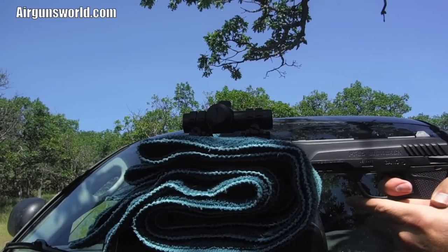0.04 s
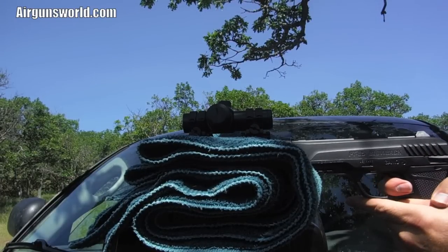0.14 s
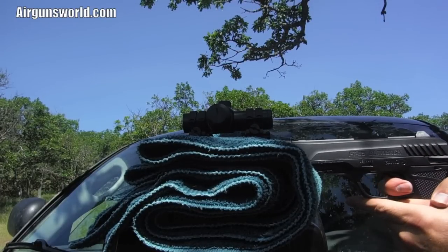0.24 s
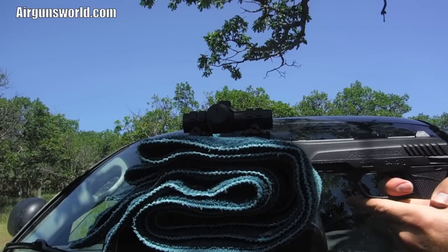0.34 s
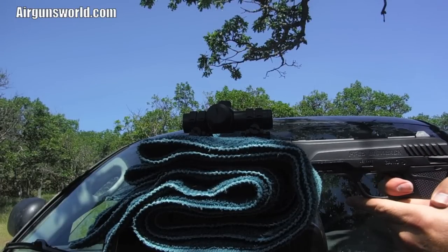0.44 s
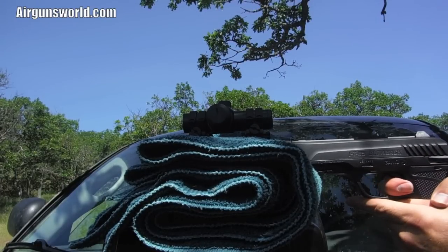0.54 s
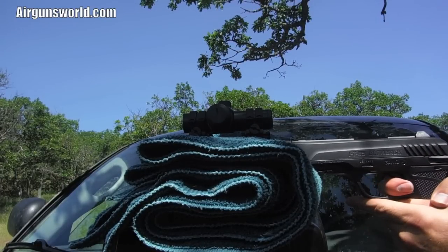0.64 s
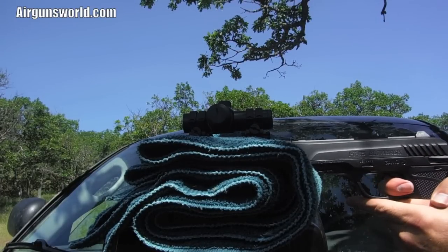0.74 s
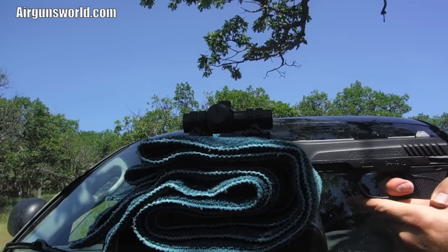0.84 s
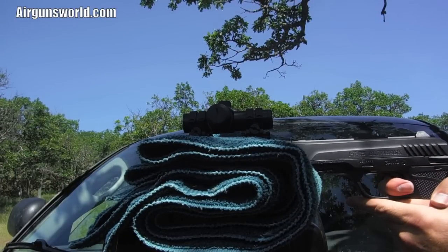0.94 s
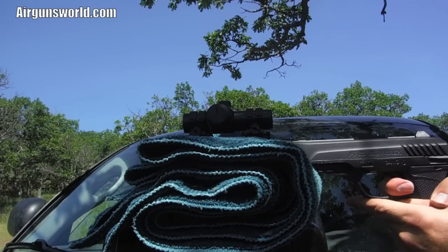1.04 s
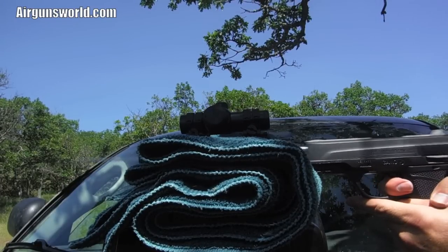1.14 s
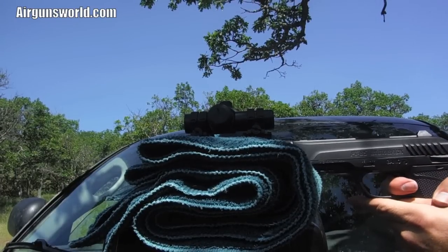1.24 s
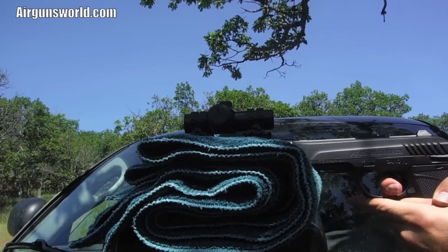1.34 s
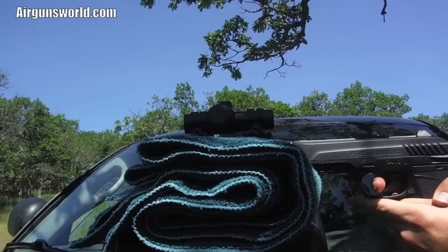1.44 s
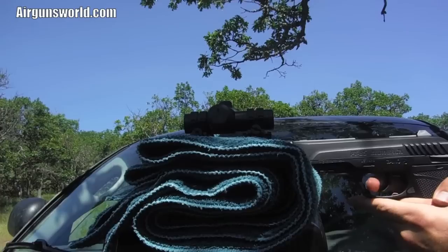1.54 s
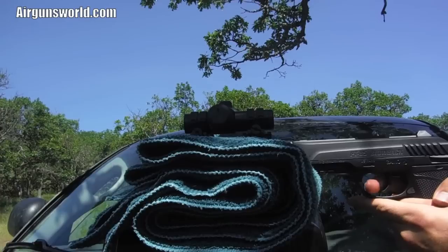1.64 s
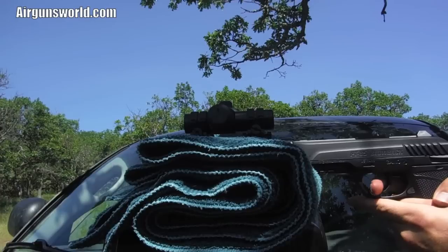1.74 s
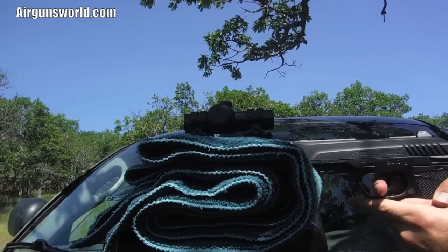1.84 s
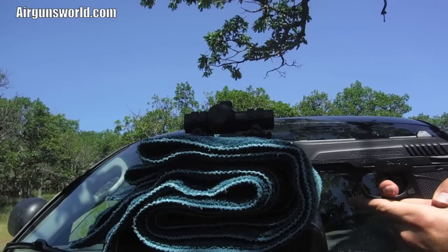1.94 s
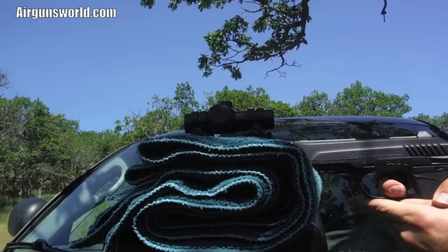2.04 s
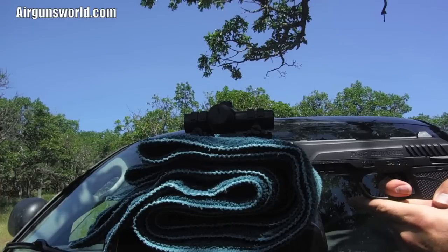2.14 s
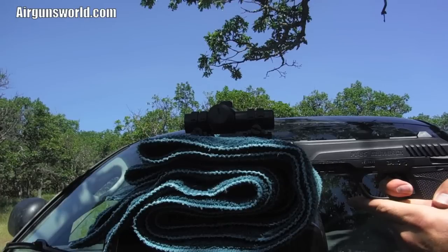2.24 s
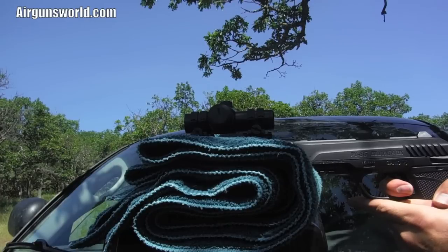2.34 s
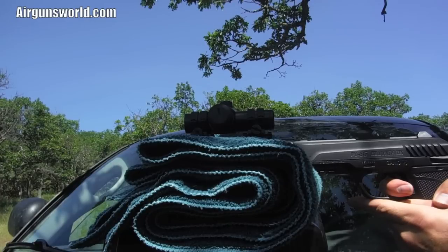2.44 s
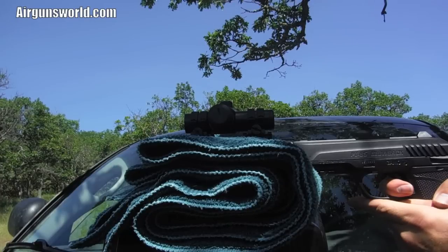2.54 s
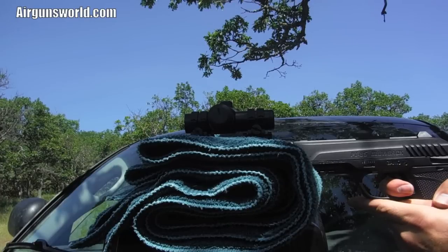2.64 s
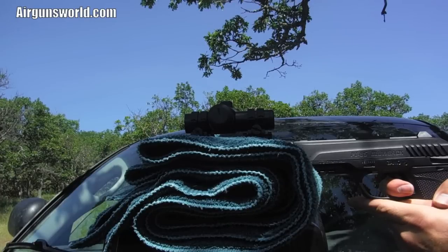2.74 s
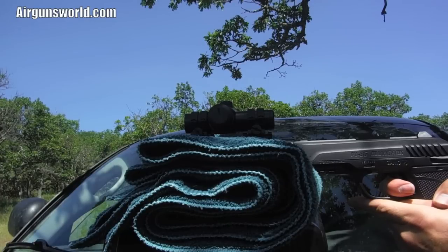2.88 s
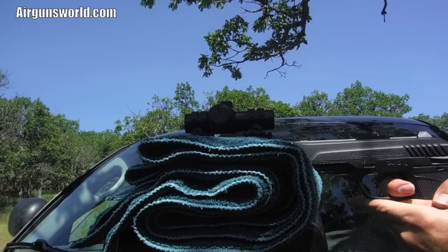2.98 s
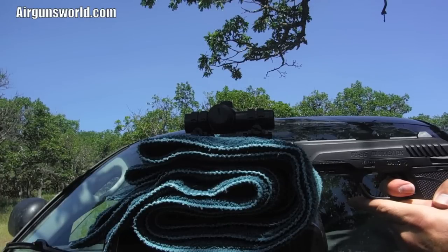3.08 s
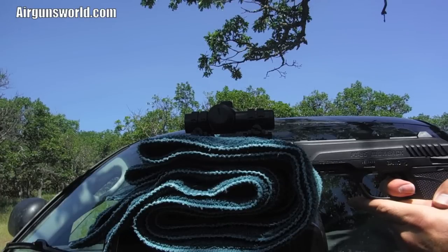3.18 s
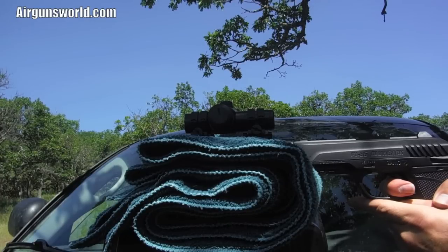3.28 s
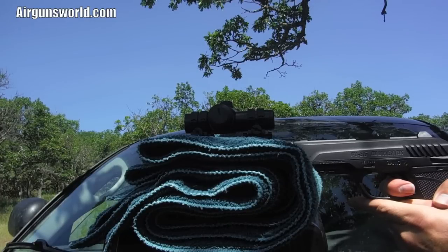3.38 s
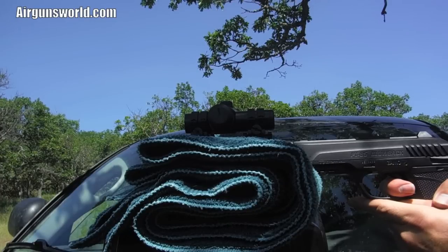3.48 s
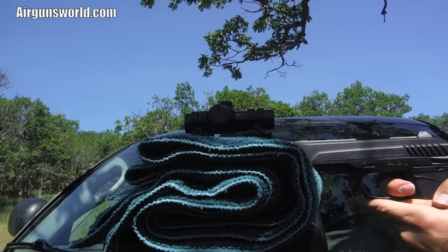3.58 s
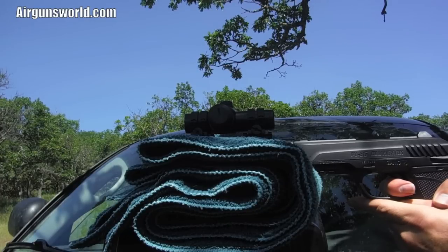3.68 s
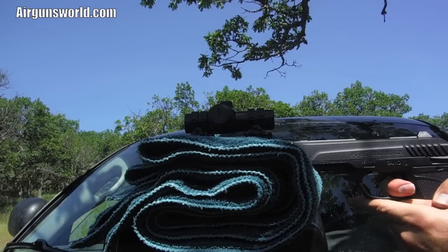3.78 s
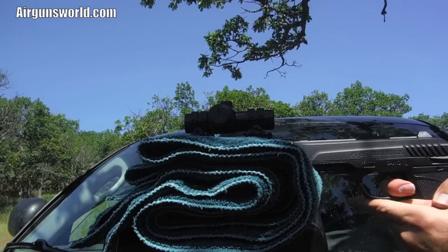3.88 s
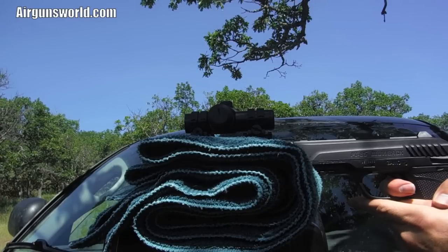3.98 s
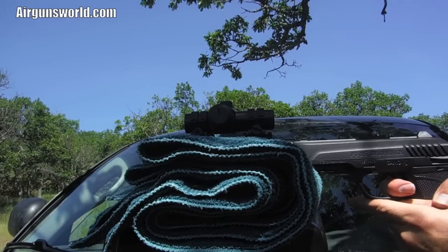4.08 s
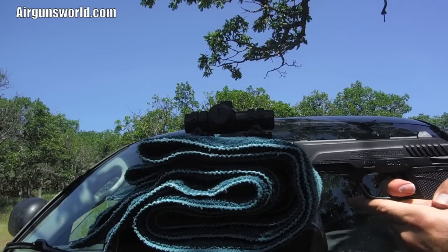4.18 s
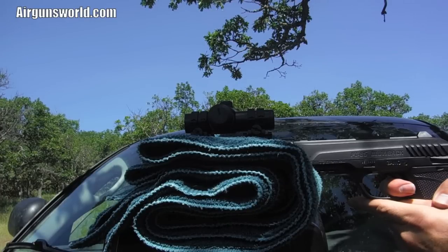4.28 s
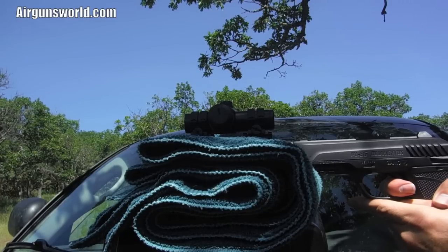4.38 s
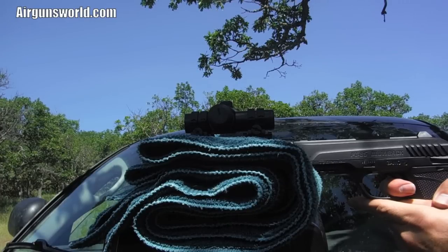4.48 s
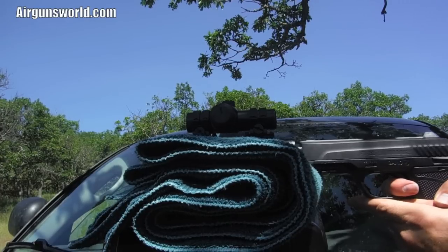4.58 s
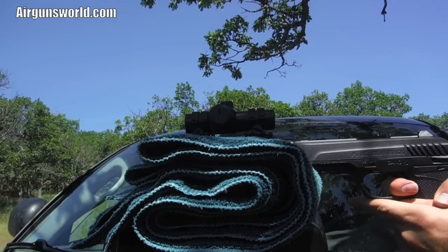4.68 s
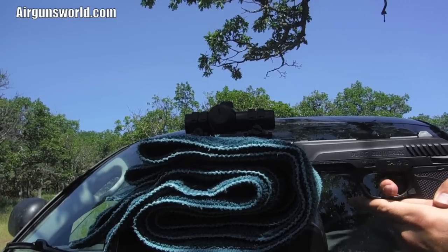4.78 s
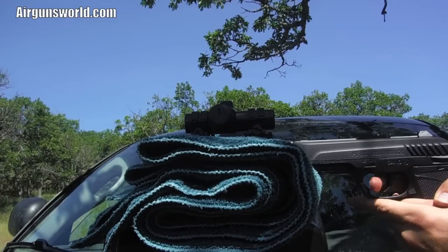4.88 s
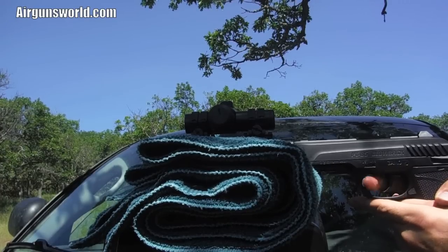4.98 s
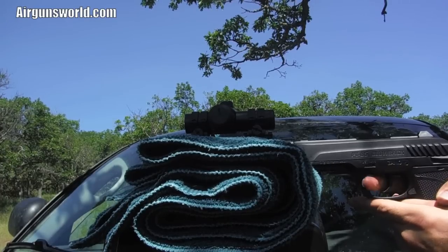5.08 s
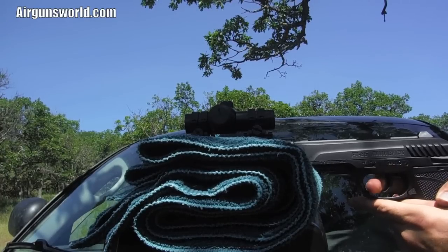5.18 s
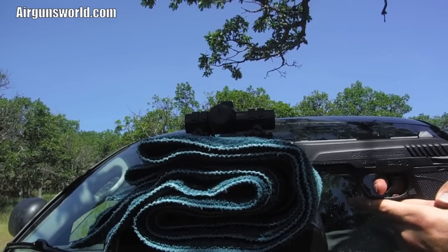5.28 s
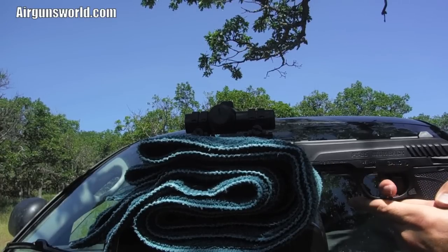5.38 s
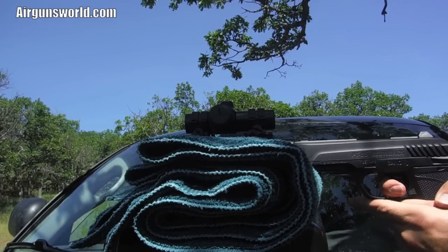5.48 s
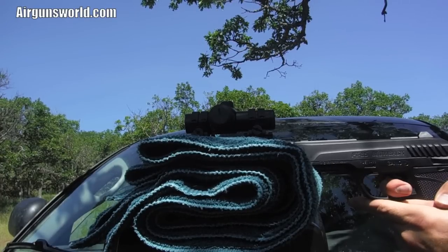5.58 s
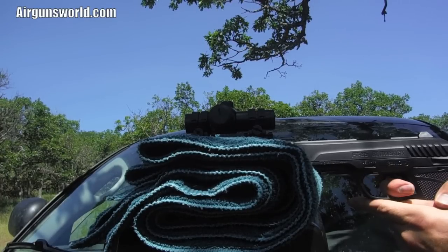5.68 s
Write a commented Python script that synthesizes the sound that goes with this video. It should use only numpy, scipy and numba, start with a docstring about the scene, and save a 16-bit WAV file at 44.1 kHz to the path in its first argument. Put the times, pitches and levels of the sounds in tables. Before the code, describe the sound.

A gas-powered air pistol fires twice outdoors, about three and a half seconds apart, close to the microphone. Each shot is a sharp, slightly overloaded blast with a metallic clang, followed at once by the pellet smacking a target and a short echo from trees. Light ticks follow, and about a second later the trigger clicks back. A faint rumble and hiss run underneath.

```python
"""Air pistol at the edge of a wood

A CO2 pistol, rested on a towel close to a camcorder, fires twice over a faint outdoor rumble. Each shot
is a sear tick, a gas blast that overloads the microphone and the clang of the action. The pellet smacks
a target, light ticks follow and the trigger clicks back. The trees scatter the blast and the smack."""
import sys
import numpy as np
from scipy import signal
from scipy.fft import rfft, irfft
from scipy.io import wavfile
from numba import njit

SR = 44100
rng = np.random.default_rng(int(sys.argv[2]) if len(sys.argv) > 2 else 0)


def to_wav(sig):
    """Store sig (one row per channel, or 1-D mono) as 16-bit WAV at the path in sys.argv[1].

    Samples outside -1..1 are clipped; the rate is SR.
    """
    pcm = np.clip(np.atleast_2d(sig), -1, 1) * 32767
    pcm = np.round(pcm).astype(np.int16)
    wavfile.write(sys.argv[1], SR, pcm.T)  # frames by channels


N = 252322
T = np.arange(N) / SR


def undb(db):
    """Decibels to gain."""
    return 10 ** (np.asarray(db) / 20)


def unit(x):
    """Scale to rms 1."""
    return x / np.sqrt(np.mean(x ** 2))


def noise(colour, tilt_db=0, size=N):
    """Noise of rms 1 shaped by an EQ curve of (freq_hz, level_db), tilted by tilt_db per octave."""
    octave = np.log2(np.fft.rfftfreq(size, 1 / SR) + 1)
    hz, db = np.transpose(colour)
    gain = undb(np.interp(octave, np.log2(hz), db) + tilt_db * octave)
    return unit(irfft(rfft(rng.standard_normal(size)) * gain, size))


def band(centre_hz, width_hz, size=N):
    """Noise of rms 1 in one steep band."""
    hz = np.fft.rfftfreq(size, 1 / SR) + 1
    gain = 1 / (1 + ((hz - centre_hz ** 2 / hz) / width_hz) ** 2)
    return unit(irfft(rfft(rng.standard_normal(size)) * gain, size))


def fade(t60_s, hold_s=0):
    """One second of envelope: a hold, then an exponential decay."""
    return np.exp(-np.log(1000) * np.maximum(T[:SR] - hold_s, 0) / t60_s)


def onset(rise_s):
    """One second of envelope that rises from silence to soften an attack."""
    return 1 - np.exp(-T[:SR] / rise_s)


def burst(colour, db, t60_s, tilt_db=0):
    """Coloured noise that starts at once and dies away."""
    return undb(db) * fade(t60_s) * noise(colour, tilt_db, size=SR)


def ping(hz, t60_s, phase=0):
    """One struck mode: a decaying sine."""
    return fade(t60_s) * np.sin(2 * np.pi * hz * T[:SR] + phase)


def ring(modes, db, sustain=1, scatter_db=1):
    """Modes of (pitch_hz, level_db, t60_s), struck a little differently each time."""
    hz, mode_db, t60_s = np.transpose(modes)
    gains = undb(mode_db + scatter_db * rng.standard_normal(len(hz)))
    phases = rng.uniform(0, 2 * np.pi, len(hz))
    tone = sum(gain * ping(f, t60 * sustain, phase) for f, gain, t60, phase in zip(hz, gains, t60_s, phases))
    return undb(db) * tone / np.sqrt(np.sum(gains ** 2) / 2)


def add(out, start_s, x):
    """Mix x in from start_s."""
    i = int(start_s * SR)
    out[i:i + len(x)] += x[:N - i]


def thin(x, hz):
    """Low cut: small, light objects radiate almost no bass."""
    return signal.sosfilt(signal.butter(3, hz, "high", fs=SR, output="sos"), x)


# EQ of the outdoor bed: freq_hz, level_db
OUTDOOR_EQ = [(12, -29), (20, 2.5), (49, -2.5), (80, 0.5), (106, -8), (133, -4), (245, -5), (315, -8),
              (614, -13.5), (1450, -22), (2760, -24.5), (8640, -27.5), (9660, -25.5), (13900, -29),
              (15500, -25.5)]


def outdoors(level_db=-50, sway_db=.5):
    """A bed of rumble and hiss whose level sways slightly."""
    return undb(level_db + sway_db * band(1.8, 4)) * noise(OUTDOOR_EQ)


# Thin bands of camcorder whine: centre_hz, width_hz, level_db
WHINE_BANDS = [(7850, 50, -75), (8200, 120, -78), (9700, 90, -70), (9950, 300, -76)]


def camcorder(field_hz=59.94, buzz_depth=.7, scan_hz=15735, scan_db=-68, throb_hz=11, throb_depth=.55):
    """The electronics whine, pulsing at the field rate, under a throbbing line-scan tone."""
    whine = sum(undb(db) * band(hz, width_hz) for hz, width_hz, db in WHINE_BANDS)
    buzz = 1 + buzz_depth * np.sin(2 * np.pi * field_hz * T)
    scan = undb(scan_db) * np.sqrt(2) * np.sin(2 * np.pi * scan_hz * T)
    throb = 1 + throb_depth * np.sin(2 * np.pi * throb_hz * T)
    return whine * buzz + scan * throb


# Cues for every layer of a shot: start_s, force_db, valve_open_s, ring_length_ratio
SHOTS = [(1.2020, 0, .018, 1), (4.614, -4, 0.011, 1.8)]
# EQ of a small metal tick: freq_hz, level_db
TICK_EQ = [(200, -31.5), (900, -24), (1400, -6.5), (2000, 2), (2500, -7.5), (3100, 0.5), (4100, -8.5),
           (5100, -2), (6100, -9.5), (7800, -3.5), (10500, -7), (16000, -25.5)]


def sear(lead_s=.0072, level_db=-31):
    """Just ahead of each blast, the sear slips and lets the hammer fly."""
    out = np.zeros(N)
    for start_s, *_ in SHOTS:
        add(out, start_s - lead_s, burst(TICK_EQ, level_db, t60_s=.11, tilt_db=-2.5))
    return out


# EQ of the broad gas blast: freq_hz, level_db
GAS_EQ = [(40, -7.5), (120, -6), (240, 2.5), (380, 4.5), (600, -9), (950, -6.5), (1400, 0.5), (2400, -4.5),
          (3300, -1), (4700, 0.5), (6000, -6), (9000, -1), (12000, -6.5), (16000, -17)]


def gas_jet(level_db=6.5, t60_s=.1):
    """Gas rushes out at full strength while the valve is open, then the barrel empties."""
    out = np.zeros(N)
    for start_s, _, open_s, _ in SHOTS:
        add(out, start_s, undb(level_db) * fade(t60_s, hold_s=open_s) * noise(GAS_EQ, size=SR))
    return out


# Hollow low ring that the blast sets off: pitch_hz, level_db, t60_s
HOLLOW_MODES = [(85, -4, 0.16), (218, 2.5, .085), (402, -4, .09)]
# EQ of the bassy puff of air: freq_hz, level_db
PUFF_EQ = [(15, -6.5), (50, -1.5), (92, 7.5), (130, -5), (200, -6.5), (400, -23), (1000, -44.5),
           (4000, -80)]


def muzzle(pop_hz=1600, pop_db=18, hollow_db=-6, puff_db=-13):
    """The pellet uncorks the barrel: a pop, a hollow ring and a slow puff of air on the microphone."""
    out = np.zeros(N)
    for start_s, force_db, *_ in SHOTS:
        pop = -undb(pop_db) * ping(pop_hz, t60_s=.007)
        hollow = ring(HOLLOW_MODES, hollow_db)
        puff = burst(PUFF_EQ, puff_db + force_db, t60_s=.3)
        add(out, start_s, pop + hollow + puff)
    return out


# Reverb of the wood, band by band: centre_hz, level_db, t60_s
TREE_BANDS = [(248, -47, 0.2), (800, -42, 0.34), (1650, -39.5, 0.7), (2700, -38.5, 0.55), (4300, -35, 0.38),
              (9000, -37.5, 0.44)]


def trees(x, build_s=.023, width_ratio=.8):
    """Trunks and leaves scatter x into a diffuse tail that swells briefly and lingers in the mids."""
    response = 0
    for hz, db, t60_s in TREE_BANDS:
        tail = band(hz, width_ratio * hz, size=SR) * fade(t60_s) * onset(build_s)
        response = response + undb(db) * tail / np.sqrt(np.sum(tail ** 2))
    return signal.fftconvolve(x, response)[:N]


# Hammer, slam and rebound: delay_s, crack_db, crack_t60_s, ring_db, sustain_ratio
BLOWS = [(.0015, -2, .024, 3.5, 1.1), (0.0313, 11, .033, 14, .95), (.0688, -3.5, .018, -8, .32)]
# EQ of each blow's crack: freq_hz, level_db
CRACK_EQ = [(100, -15), (600, -15), (1000, -1.5), (1600, 6), (2500, -5.5), (5000, 2.5), (6200, -9),
            (8300, 0.5), (11000, -5.5), (16000, -17)]
# Clang of barrel and frame: pitch_hz, level_db, t60_s
FRAME_MODES = [(1240, -14, .05), (1440, -8, .055), (1562, -2, .07), (1657, -11, .055), (2312, -13, .065),
               (3070, -10, .065), (3430, -12, .04), (4390, -15, .04), (4902, -5, .065), (4975, -9, .06),
               (5378, -17, .06), (6265, -14, .045), (6975, -9, .06), (7442, -8, .04), (7685, -3, .045),
               (8080, 3, .045), (8850, -14, .055), (9700, -13, .06), (9920, -3, .068), (11290, -15, .04)]


def action(free_s=.022, seated_t60_s=.038):
    """The hammer strikes the valve, then the action slams and rebounds; each blow rings the frame."""
    out = np.zeros(N)
    damping = fade(seated_t60_s, hold_s=free_s)  # the parts settle and choke the ring
    for start_s, force_db, _, length in SHOTS:
        for delay_s, crack_db, crack_t60_s, ring_db, sustain in BLOWS:
            clang = ring(FRAME_MODES, ring_db, sustain * length) * damping
            crack = burst(CRACK_EQ, crack_db, crack_t60_s * length)
            add(out, start_s + delay_s, undb(force_db) * (crack + clang))
    return out


# EQ of the pellet's impact: freq_hz, level_db
TARGET_EQ = [(200, -36), (700, -15.5), (1600, 4), (3000, -0.5), (5000, 3), (6500, -11), (9000, -9),
             (16000, -26)]


def target(flight_s=.108, smack_db=3.5, rustle_db=-16):
    """The pellet lands after its flight: a hard smack with a short rustling tail."""
    out = np.zeros(N)
    for start_s, force_db, *_ in SHOTS:
        smack = burst(TARGET_EQ, smack_db, t60_s=.0064)
        rustle = burst(TARGET_EQ, rustle_db, t60_s=.076)
        add(out, start_s + flight_s, undb(force_db) * (smack + rustle))
    return out


# Light ticks after a shot, in playing order: level_db, t60_s, tilt_db_per_octave, ping_hz, ping_db
CONTACTS = [(-22, .014, -2.5, 4300, -22), (-15, .013, -1.5, 8600, -17.5), (-26.5, 0.019, 5, 6500, -25),
            (-29, 0.01, -3, 5200, -45), (-41.5, 0.012, -6.5, 4860, -51)]
# Their cues, a row per shot, four ticks and then five: start_s of each
CONTACT_CUES = [(1.373, 1.4106, 1.426, 1.5065), (4.7986, 4.8391, 4.849, 4.9144, 5.0085)]


def contacts(rise_s=.0005, ping_t60_s=.019):
    """Light metal contacts: each small part ticks and pings at its own pitch."""
    out = np.zeros(N)
    for cues in CONTACT_CUES:
        for start_s, (db, t60_s, tilt_db, ping_hz, ping_db) in zip(cues, CONTACTS):
            tick = burst(TICK_EQ, db, t60_s, tilt_db)
            tone = undb(ping_db) * ping(ping_hz, ping_t60_s)
            add(out, start_s, onset(rise_s) * (tick + tone))
    return out


# Ticks of the light pawl: start_s, level_db
PAWL_TICKS = [(2.1398, -29), (5.6097, -28)]
# Ring of the pawl: pitch_hz, level_db, t60_s
PAWL_MODES = [(1380, -9, .025), (1950, -3, .014), (3420, 0.5, 0.013), (5030, 1.5, .018), (7000, 3, 0.016)]
# Snaps of the linkage: start_s, level_db
LINKAGE_SNAPS = [(2.165, -32), (2.1733, -16.5), (5.6482, -19.5)]
# Ring of the linkage: pitch_hz, level_db, t60_s
LINKAGE_MODES = [(1480, -12, .035), (1850, -1, .012), (3070, 1, .017), (3640, -1, .014), (5120, 1.5, .016),
                 (7450, -5, .012), (8800, -8, .014), (10050, -8, .015)]


def trigger(rise_s=.00073, frame_db=-20, snap_db=3, snap_growth=1.24):
    """The trigger springs forward past a pawl, then its linkage snaps home; the frame rings faintly."""
    out = np.zeros(N)
    for cues, modes in ((PAWL_TICKS, PAWL_MODES), (LINKAGE_SNAPS, LINKAGE_MODES)):
        for start_s, db in cues:
            snap = burst(TICK_EQ, snap_db + snap_growth * db, t60_s=.013)  # harder hits are crisper
            clack = snap + ring(modes, db) + ring(FRAME_MODES, db + frame_db)
            add(out, start_s, onset(rise_s) * clack)
    return out


def scene():
    """Mono mix: gas jet and pellet strike carry to the trees; the mechanism stays close and dry."""
    loud = gas_jet() + thin(target(), hz=1200)
    close = muzzle() + action() + thin(sear() + contacts() + trigger(), hz=900)
    return (loud + trees(loud) + close + outdoors() + camcorder())[None]


@njit
def follow(x, attack_s, release_s):
    """Envelope that rises and falls at different speeds."""
    out, level = np.empty(len(x)), 0.
    for i in range(len(x)):
        lag_s = attack_s if x[i] > level else release_s
        level += (x[i] - level) / (lag_s * SR)
        out[i] = level
    return out


def record(dry, ceiling=.7, duck_db=12, attack_s=.011, release_s=.2, top_hz=16100):
    """Overload ducks the gain for a moment; the blast still clips flat; the top end is cut."""
    overload = np.clip(np.abs(dry[0]) / ceiling - .5, 0, 1)
    gain = undb(-duck_db * follow(overload, attack_s, release_s))
    clipped = np.clip(dry * gain, -ceiling, ceiling)
    high_cut = signal.ellip(8, .1, 50, top_hz, fs=SR, output="sos")
    return signal.sosfiltfilt(high_cut, clipped)


dry = scene()
out = record(dry)
to_wav(out)
```